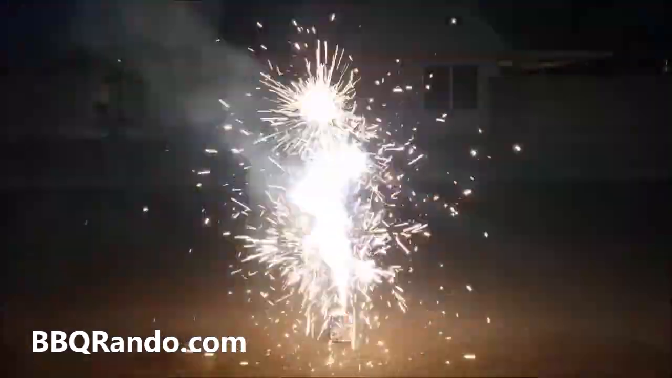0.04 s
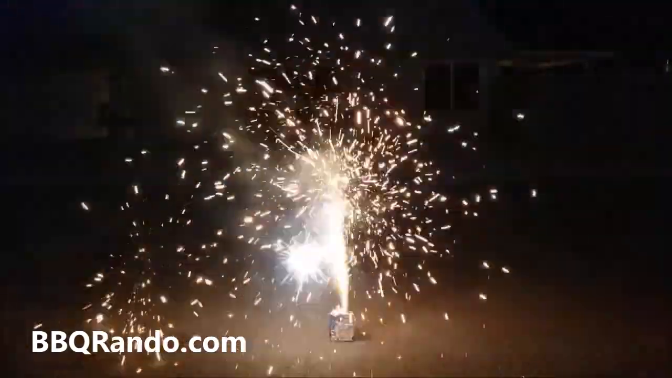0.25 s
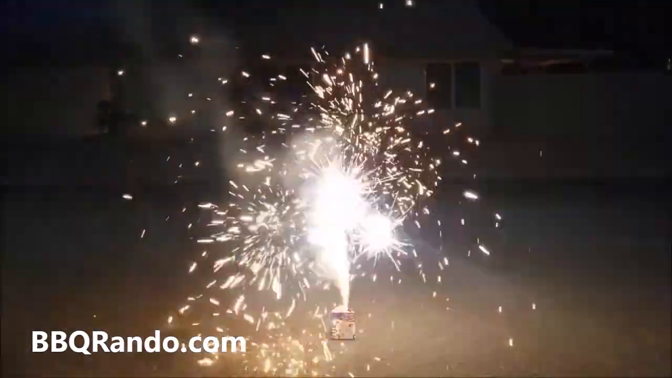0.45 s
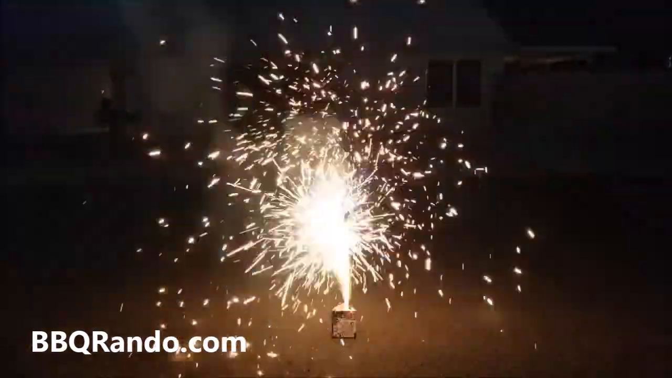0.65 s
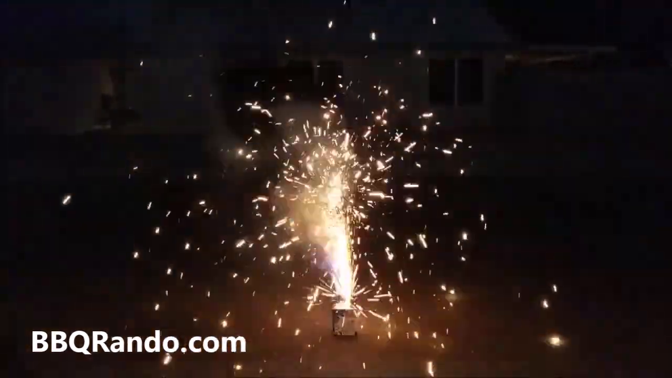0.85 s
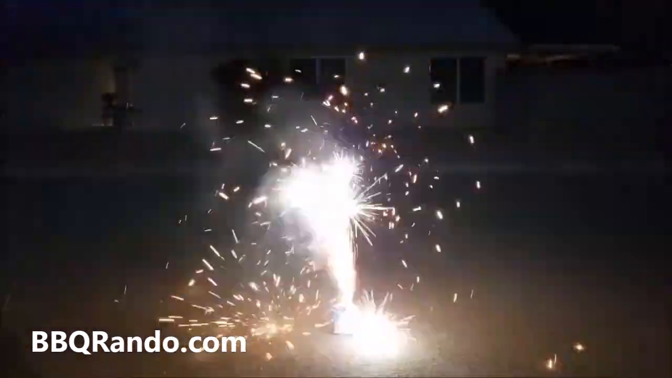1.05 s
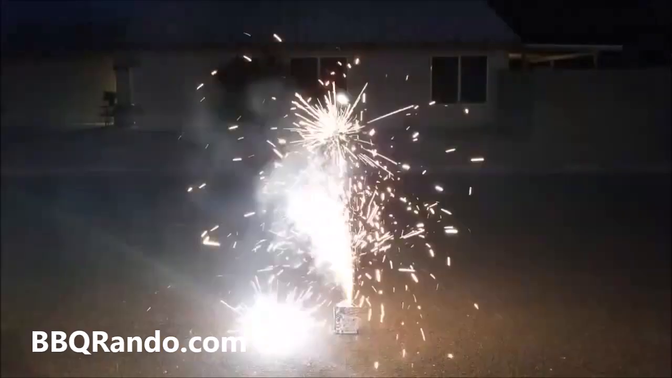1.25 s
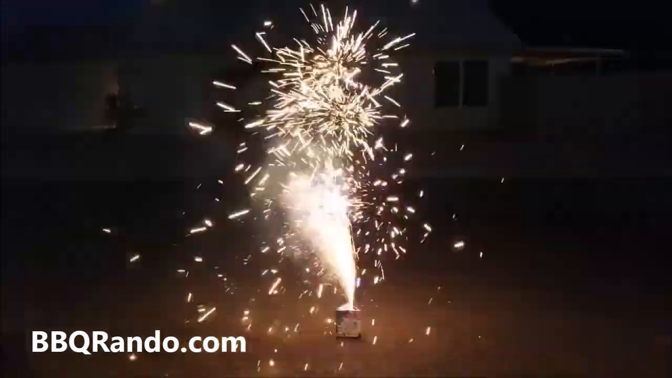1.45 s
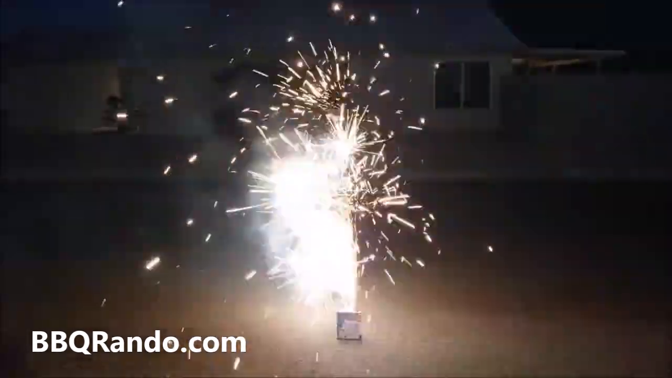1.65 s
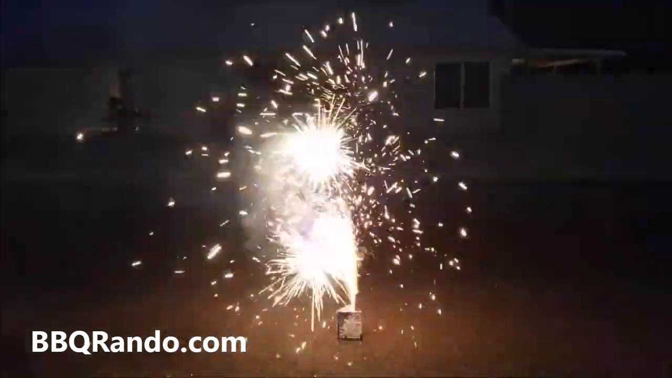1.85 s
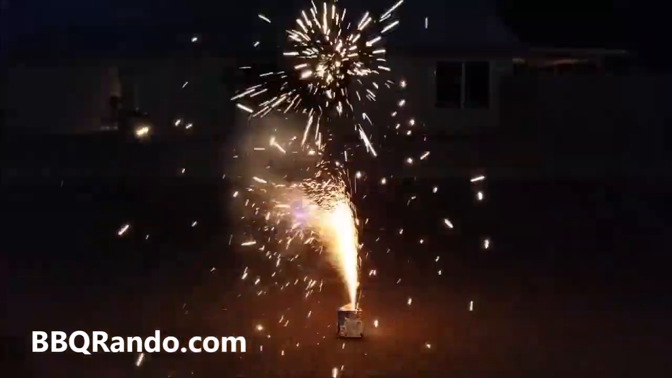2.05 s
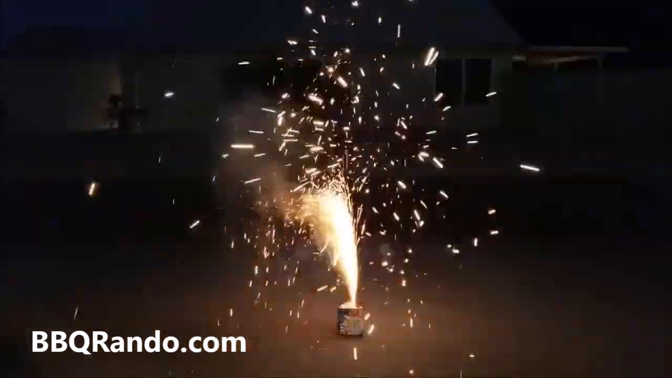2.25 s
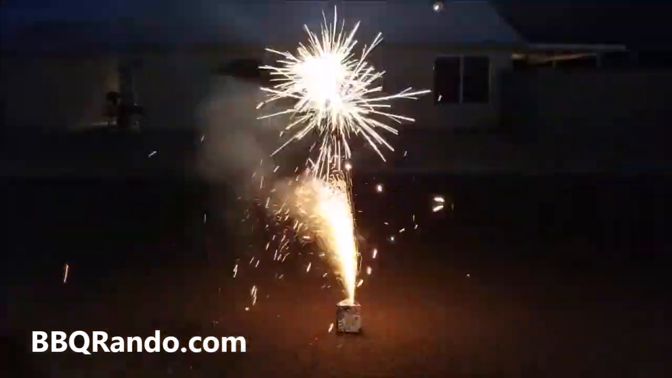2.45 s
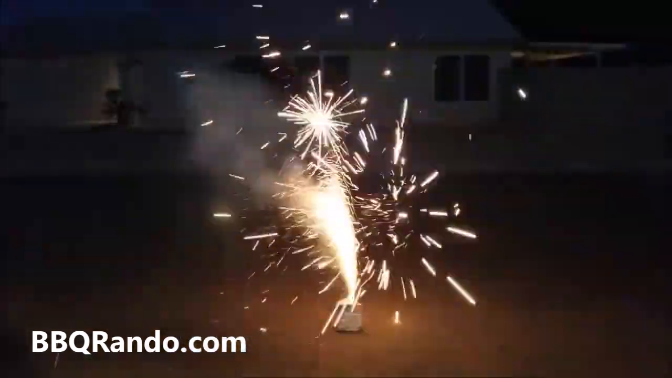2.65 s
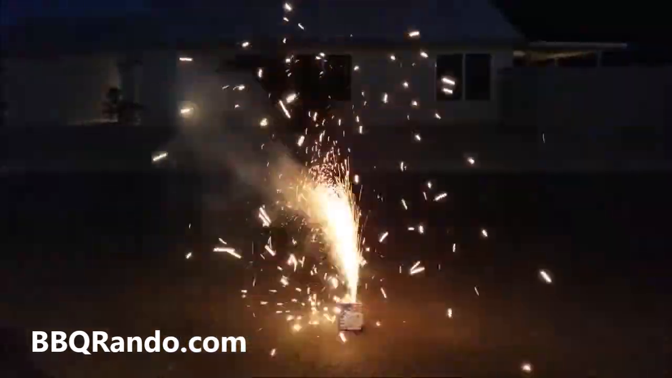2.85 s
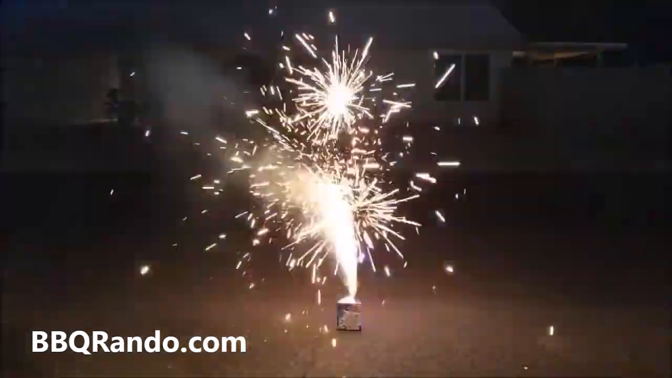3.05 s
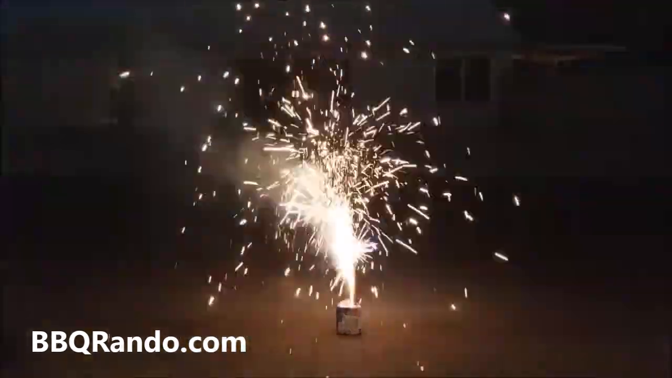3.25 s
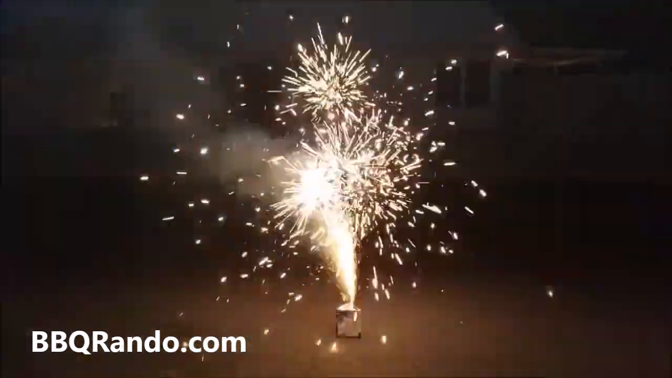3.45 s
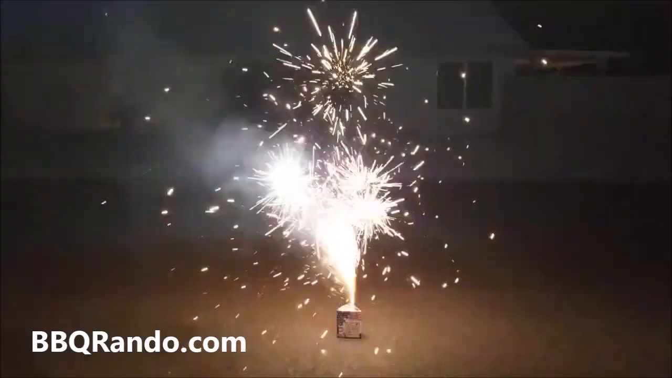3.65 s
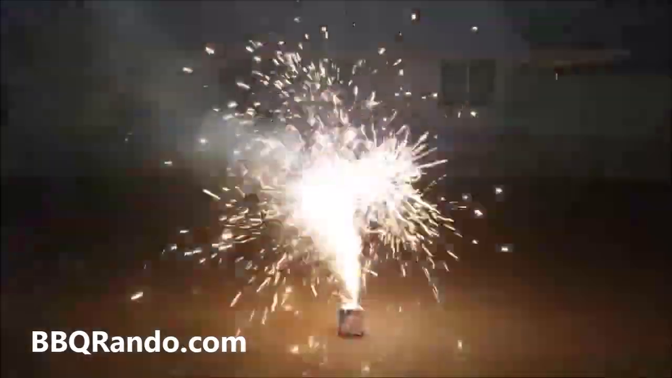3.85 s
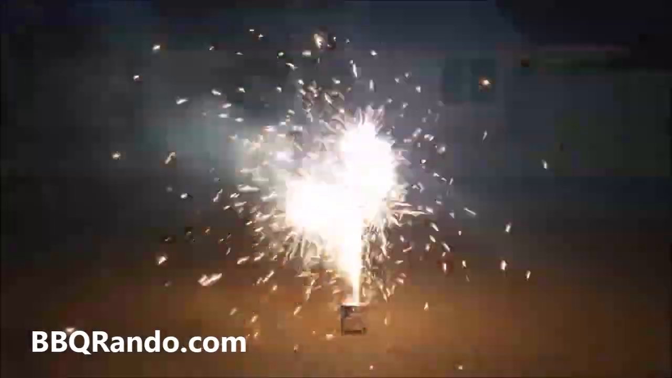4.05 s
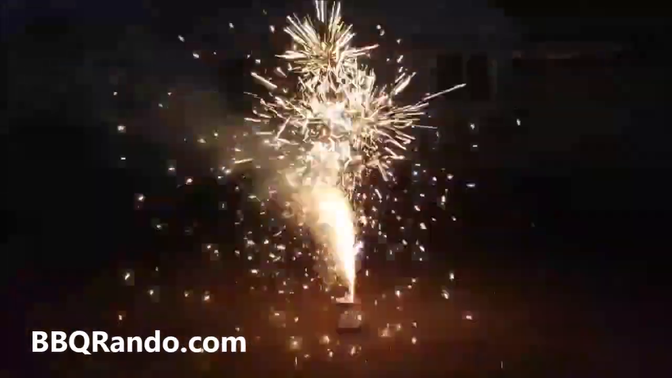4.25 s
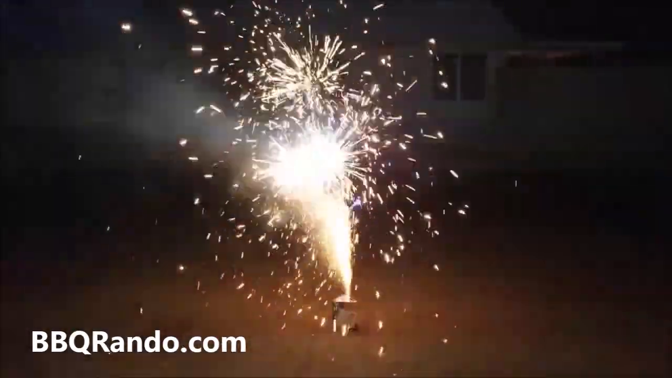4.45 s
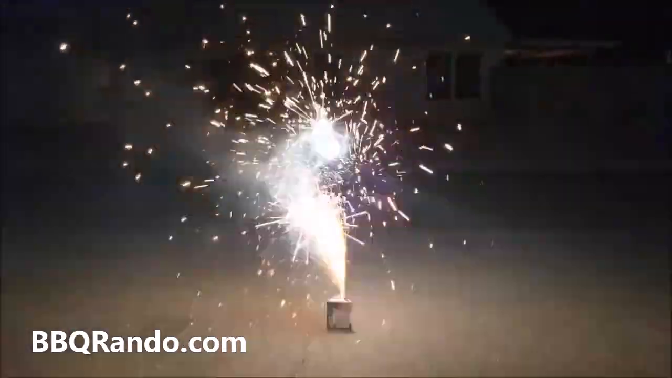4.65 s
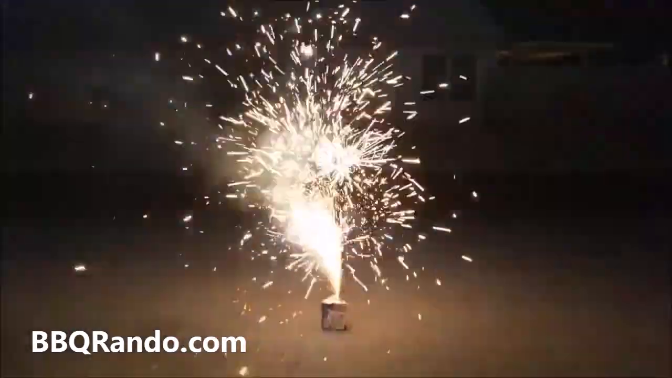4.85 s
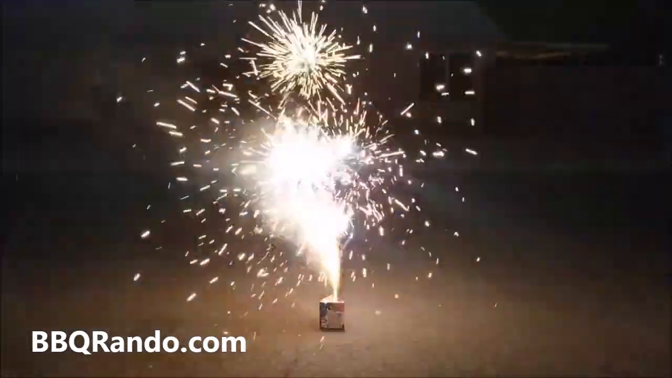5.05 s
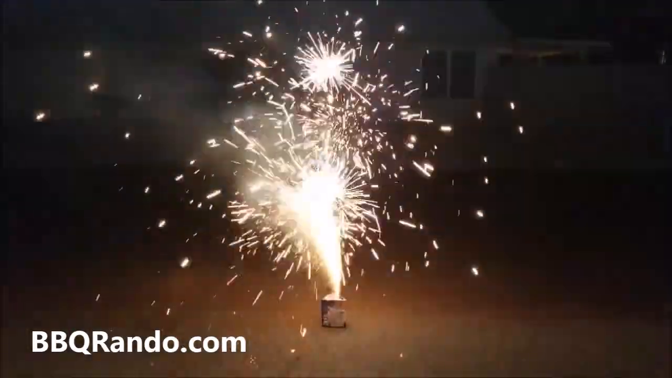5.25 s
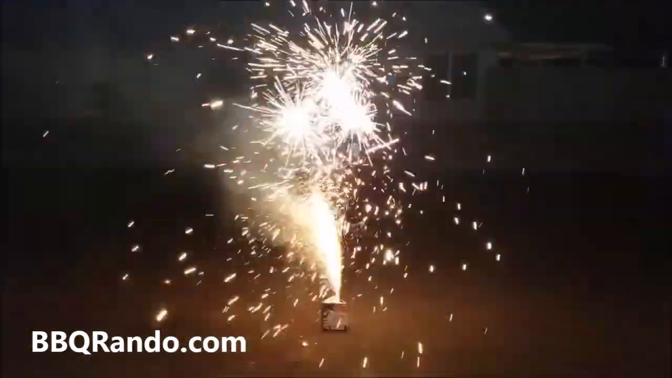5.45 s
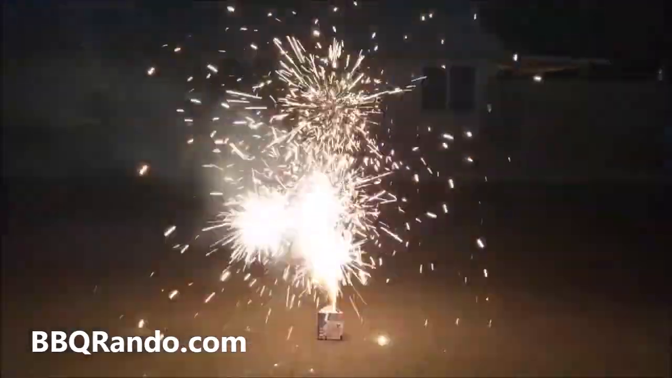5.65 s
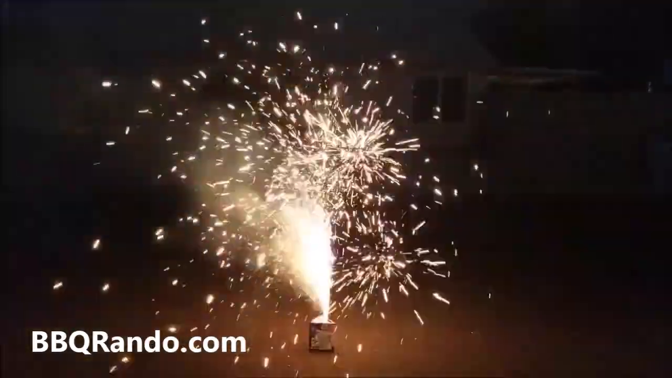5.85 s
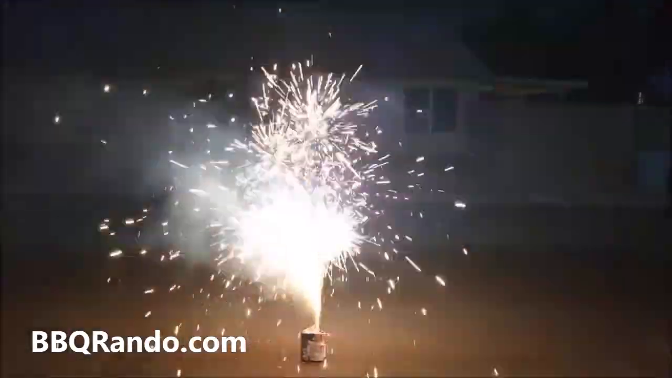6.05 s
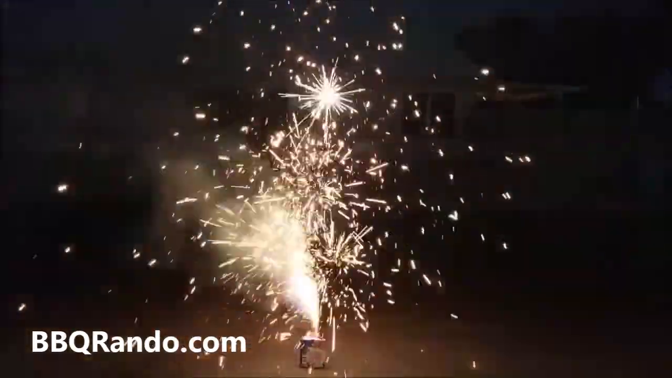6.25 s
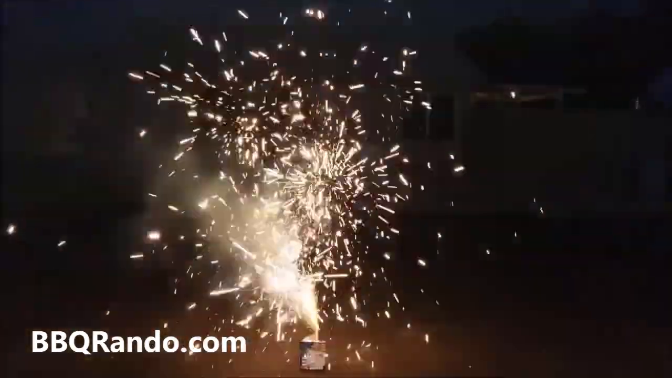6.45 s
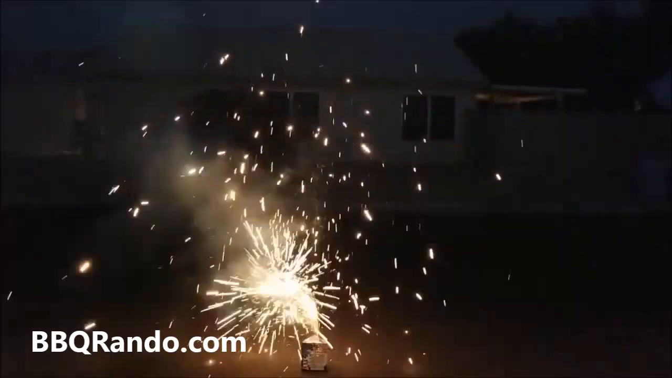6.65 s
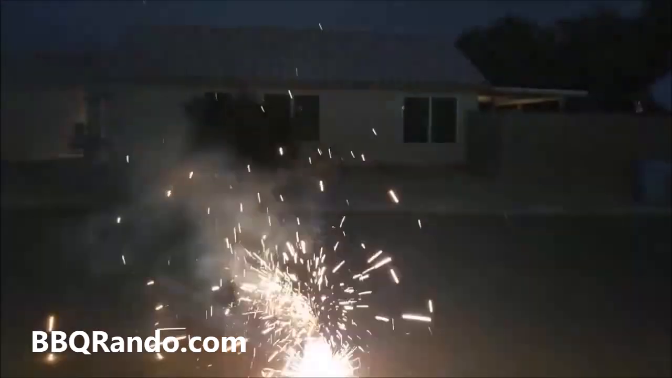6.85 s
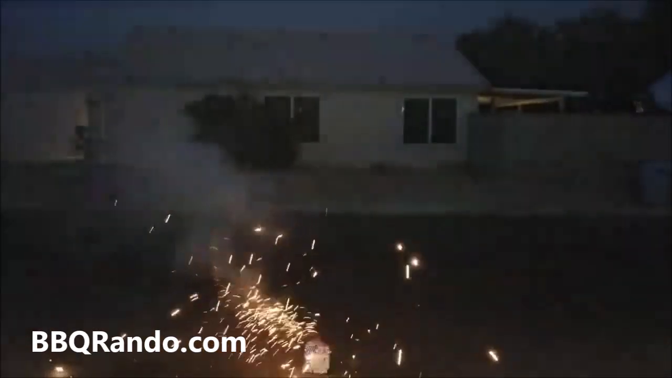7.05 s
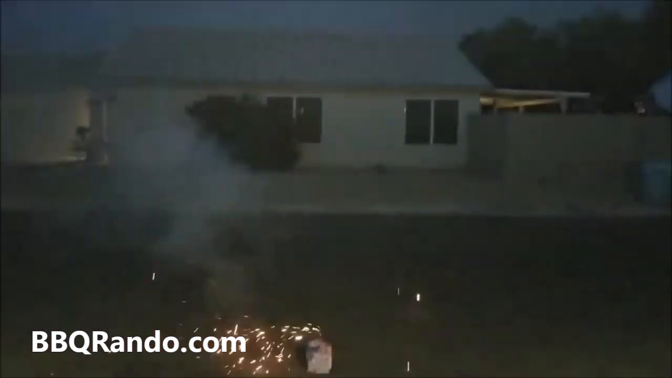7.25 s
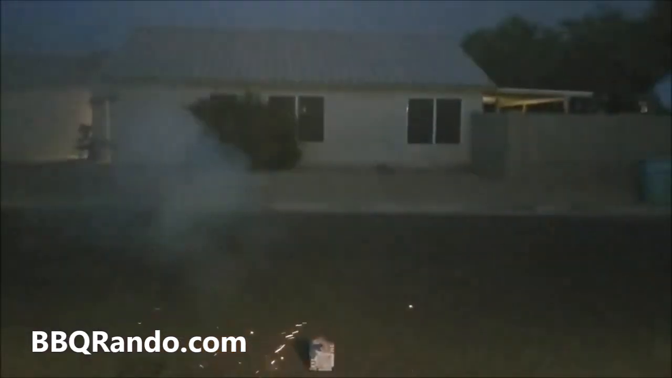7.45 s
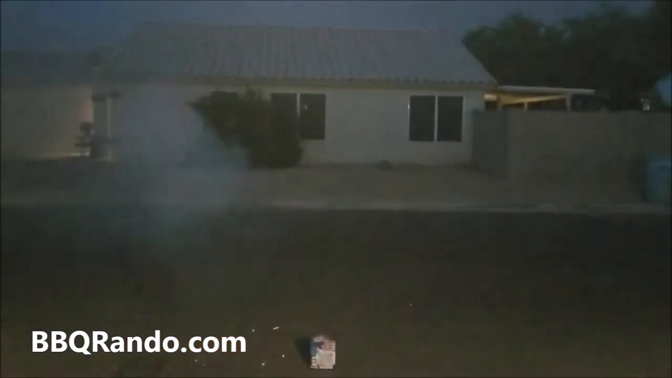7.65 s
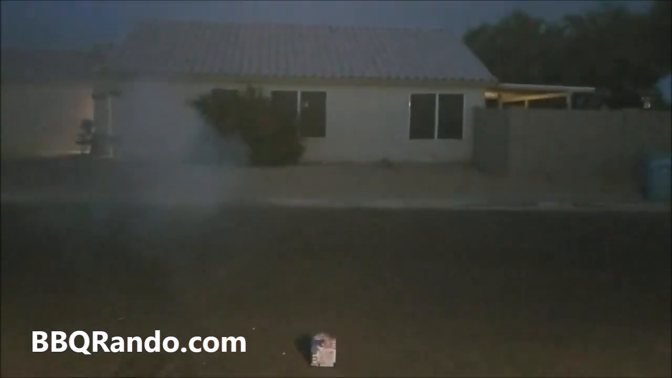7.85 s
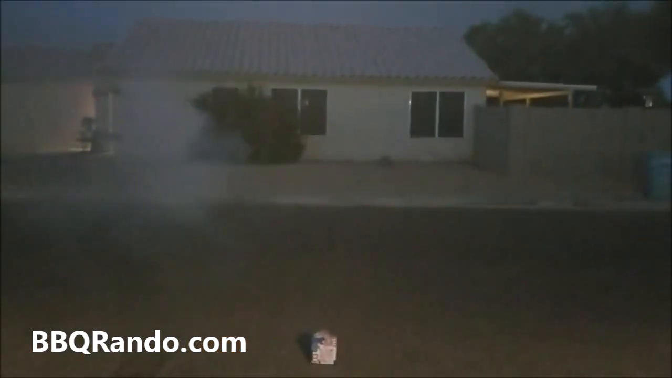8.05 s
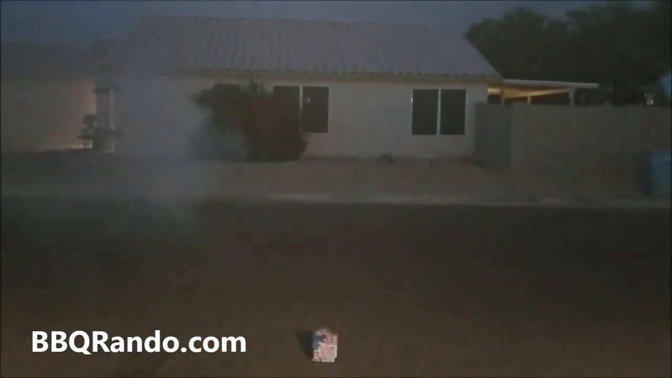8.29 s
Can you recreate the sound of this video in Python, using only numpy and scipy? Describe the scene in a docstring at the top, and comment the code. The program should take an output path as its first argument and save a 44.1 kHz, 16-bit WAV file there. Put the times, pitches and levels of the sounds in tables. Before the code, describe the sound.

A ground firework fountain crackles furiously with sharp, dense pops over a faint hiss outdoors, then stops near seven seconds, leaving a low distant hum.

```python
"""A ground fountain firework burns on a quiet street at dusk, a few metres away, over the hum of a distant town.
From the start its jet hisses (coloured noise) and its stars crackle: clusters of sharp clicks amid noise.
Ground and houses answer with delayed copies and noise tails; damped low swings thump the left microphone port.
From about two seconds the hand-held phone turns, which mixes in a second colour at each port.
Near seven seconds the last pops sound and the jet dies away; the town hum, low filtered noise, is left."""
import sys
import numpy as np
from scipy import signal
from scipy.fft import rfft, irfft, next_fast_len
from scipy.io import wavfile

SR = 44100
rng = np.random.default_rng(int(sys.argv[2]) if len(sys.argv) > 2 else 0)


def to_wav(s):
    """Save 16-bit WAV."""
    ch = np.atleast_2d(s).T  # columns
    pcm = np.round(np.clip(ch, -1, 1) * 32767)  # PCM
    wavfile.write(sys.argv[1], SR, pcm.astype(np.int16))


N = 366896
TIME = np.arange(N) / SR
CRACK_MS = 2.8   # length of a star that goes off all at once
LEAD_MS = 0.7    # noise leads each star's first click by this long, for a softer onset


def from_db(db):
    """Amplitude factor of a level in dB."""
    return 10 ** (np.asarray(db) / 20)


def rms_one(x):
    """Scale to rms 1."""
    return x / np.sqrt(np.mean(x ** 2) + 1e-20)


def in_time(rows):
    """Value of a (seconds, value) curve at every sample."""
    return np.interp(TIME, *np.transpose(rows))


def coloured(x, spectrum, size=2048):
    """Causal minimum-phase filter through (Hz, dB) points, by folding the cepstrum."""
    hz, level_db = np.transpose(spectrum)
    grid_hz = np.maximum(np.arange(size // 2 + 1) * SR / size, 1)
    gain_db = np.interp(np.log(grid_hz), np.log(hz), level_db)
    cepstrum = irfft(np.log(from_db(gain_db)))
    cepstrum[1:size // 2] *= 2
    cepstrum[size // 2 + 1:] = 0
    response = irfft(np.exp(rfft(cepstrum)))
    return signal.oaconvolve(np.atleast_2d(x), response[None], axes=1)[:, :N]


def air_noise(spectrum, alike_hz):
    """Stereo noise of rms 1: alike at both ports in the bass, unrelated in the treble."""
    shared = rng.standard_normal(N)
    own = rng.standard_normal((2, N))
    low = signal.butter(2, alike_hz, "low", fs=SR, output="sos")
    high = signal.butter(2, alike_hz, "high", fs=SR, output="sos")
    return rms_one(coloured(signal.sosfilt(low, shared) + signal.sosfilt(high, own), spectrum))


def jet(gain_db):
    """Turbulent hiss of the jet: coloured noise under a level curve."""
    # Each row: time in seconds, relative level in dB.
    jet_level = [(0, -41), (.7, -46.5), (1.0, -48.5), (1.9, -46), (2.4, -48), (2.85, -42), (3.7, -45),
                 (4.3, -43), (5.1, -44.5), (6.4, -48.5), (6.6, -75.5), (6.9, -61), (7.3, -87)]
    # Spectrum of the roar. Each row: frequency in Hz, relative density in dB.
    jet_spectrum = [(100, -7), (500, -7), (1100, -0.5), (1550, 4.5), (2300, 1.5), (4000, -1), (7000, -10.5),
                    (16000, -16)]
    return from_db(in_time(jet_level) + gain_db) * air_noise(jet_spectrum, alike_hz=1544)


def town():
    """Hum of the distant town: mostly low noise, 3 dB stronger at the left."""
    # Each row: time in seconds, relative level in dB.
    town_level = [(0, -60.5), (6.9, -59), (7.4, -58.5), (8.3, -55)]
    # Spectrum. Each row: frequency in Hz, relative density in dB.
    town_spectrum = [(25, -26), (50, 0), (120, -8), (260, -7.5), (400, -16), (1100, -14), (2450, -17.5),
                     (3000, -29), (6300, -35.5), (9500, -55), (12500, -37.5), (16000, -43.5)]
    balance = from_db([[1.5], [-1.5]])
    return from_db(in_time(town_level)) * air_noise(town_spectrum, alike_hz=482) * balance


def star(length_ms, pops_per_ms, spread_db, fizz_db, ground_db, ground_ms, clump_db, clump_full_ms, size=1500):
    """One star: grains pop at random, as a rule a big one first, amid noise; rms 1 over its length."""
    span = max(int(length_ms * SR / 1000), 2)
    total = next_fast_len(span + size)
    count = 1 + int(abs(length_ms * pops_per_ms))
    index = np.arange(count)[:, None]
    later = index > 0
    at_s = (index + rng.random((count, 1)) * later) / count * span / SR

    # the opening pop stands out more in a long run
    first_db = 1 + np.log2(length_ms / CRACK_MS)
    later_db = spread_db * np.clip(rng.standard_normal((count, 1)), -2, 1.3)
    sizes = from_db(np.where(later, later_db, first_db))

    # each grain: a click with its own broad resonance, on average slightly later at the right port
    hz = np.arange(total // 2 + 1) * SR / total
    resonance_hz = np.exp(rng.uniform(np.log(900), np.log(14000), (count, 1)))
    ratio = 1j * hz / resonance_hz
    grains = sizes * (1 + 1.1 * ratio / (1 + ratio + ratio ** 2))
    lags_s = np.array([np.zeros((count, 1)), rng.normal(2e-5, 3e-5, (count, 1))])
    phase = (2 * np.pi * hz * (at_s + lags_s + LEAD_MS / 1000)).astype(np.float32)
    pops = irfft(np.sum(grains * (np.cos(phase) - 1j * np.sin(phase)), axis=1), total)

    noise_on = np.arange(total) < span + LEAD_MS * SR / 1000
    fizz = rng.standard_normal((2, total)) * noise_on
    burst = rms_one(pops) + from_db(fizz_db) * rms_one(fizz)

    # clumps, strongest in long bursts
    depth_db = clump_db * min(length_ms / clump_full_ms, 1)
    period_s = rng.uniform(0.00914, 0.019)
    burst = burst * from_db(depth_db * np.cos(2 * np.pi * TIME[:total] / period_s))

    # the star's height sets the delay of the ground echo
    delay_ms = ground_ms * rng.uniform(0.6, 1.4)
    echo = np.roll(burst, int(delay_ms * SR / 1000), axis=1)
    return rms_one(burst + from_db(ground_db) * echo) * np.sqrt(span / total)


def echo_power(t, t60_s, swell_s):
    """Power of a diffuse echo that swells, then dies away; sums to 1."""
    power = (from_db(-60 * t / t60_s) * (1 - np.exp(-(t / swell_s) ** 2))) ** 2
    return power / power.sum()


def scatter(x, level_db, t60_s, swell_s):
    """Dense reflections: noise that follows each pop and dies away, different at each port."""
    t = TIME[:x.shape[1]]
    fade = echo_power(t, t60_s, swell_s)
    power = signal.fftconvolve(x ** 2, fade[None], axes=1)[:, :len(t)]
    return from_db(level_db) * np.sqrt(np.abs(power)) * rng.standard_normal(x.shape)


def small_stars():
    """Weak cracks at uneven intervals, at a changing rate: rows (seconds, relative dB)."""
    # Each row: time in seconds, stars per second (below 0 counts as none).
    star_rate = [(0, 12), (1.7, 6), (1.9, 1), (2.9, -0.5), (3.1, 15), (5.3, 12.5), (5.9, 0)]
    mean_db, spread_db = -32.5, 1.5
    thrown = np.cumsum(np.maximum(in_time(star_rate), 0)) / SR
    chance = rng.random((int(thrown[-1]), 2))
    start_s = np.interp(np.arange(len(chance)) + chance[:, 0], thrown, TIME)
    return zip(start_s, mean_db + spread_db * (2 * chance[:, 1] - 1))


def crackle(crack_gain_db, sputter_gain_db):
    """All the stars, each with its own brightness and its own scatter off the rough ground."""
    # Stars that break up in a run of pops. Each row: start in seconds, length in ms, relative level in dB.
    sputter_rows = [(.001, 19.7, -26.5), (.047, 30.7, -24), (.079, 62, -29.5), (.186, 65, -28.5),
                    (.323, 25, -28), (0.367, 36.4, -26.5), (.416, 19.4, -26.5), (.479, 40, -28.5),
                    (.552, 41, -28.5), (.676, 40.5, -30.5), (.921, 33.4, -28.5), (1.079, 19, -27.5),
                    (1.127, 25.4, -27.5), (1.423, 27.2, -27.5), (1.627, 25, -29), (1.695, 29.6, -25.5),
                    (1.78, 30, -29.5), (1.833, 18, -27), (2.722, 11.3, -23), (2.904, 11, -23),
                    (3.001, 42.5, -30), (3.069, 49, -27.5), (3.251, 22, -29), (3.306, 12, -25.5),
                    (3.36, 53, -29.5), (3.475, 8.5, -23.5), (3.563, 21.7, -29.5), (3.641, 40, -24),
                    (3.695, 57.4, -25.5), (3.816, 36.4, -24.5), (3.871, 70, -33), (4.041, 31.4, -30),
                    (4.106, 35.6, -26.5), (4.163, 72, -33.5), (4.325, 29, -29.5), (4.384, 9.7, -28.5),
                    (4.504, 10, -27.5), (4.681, 48, -28.5), (4.79, 33.4, -29.5), (4.857, 96, -30.5),
                    (5.01, 66, -31), (5.211, 48.6, -28.5), (5.346, 109, -31), (5.476, 9.4, -25),
                    (5.513, 15.7, -28), (5.592, 7.2, -22.5), (5.675, 62, -32), (5.782, 12.5, -24.5),
                    (5.821, 18.2, -28.5), (5.921, 40.3, -27), (6.016, 18, -28), (6.077, 39, -32),
                    (6.166, 50, -30.5), (6.309, 21.2, -28.5), (6.373, 6.2, -25), (6.402, 55, -30)]
    # Stars that go off in one crack. Each row: start in seconds, relative level in dB.
    crack_rows = [(.034, -20.5), (.148, -22), (.289, -24), (.538, -26.5), (.617, -27), (.63, -24.5),
                  (.639, -24), (.66, -23.5), (.749, -23), (.767, -25), (.778, -26), (.81, -29.5),
                  (.873, -28), (.884, -26.5), (1.005, -28), (1.013, -20.5), (1.16, -25), (1.17, -21.5),
                  (1.188, -21), (1.241, -26), (1.259, -24), (1.286, -18.5), (1.39, -18.5), (1.403, -24),
                  (1.485, -29.5), (1.507, -29), (1.52, -27), (1.587, -26), (1.609, -18.5), (1.669, -21),
                  (1.682, -34), (1.751, -24), (1.799, -24.5), (1.969, -28.5), (1.981, -31), (1.996, -28.5),
                  (2.03, -21.5), (2.155, -19.5), (2.168, -21.5), (2.2, -22), (2.299, -26), (2.365, -33.5),
                  (2.448, -25.5), (2.454, -21.5), (2.521, -27), (2.59, -19.5), (2.637, -32), (2.677, -26.5),
                  (2.962, -21), (2.993, -17), (3.028, -21.5), (3.131, -24), (3.145, -24), (3.178, -22.5),
                  (3.215, -21.5), (3.226, -21.5), (3.295, -24.5), (3.325, -25), (3.346, -19.5),
                  (3.431, -21), (3.458, -19), (3.507, -24), (3.534, -25.5), (3.599, -20), (3.624, -28),
                  (3.789, -23.5), (3.802, -18.5), (3.903, -24), (3.948, -19.5), (3.97, -23), (3.982, -22.5),
                  (4.013, -25), (4.078, -21), (4.24, -28), (4.26, -22.5), (4.401, -32), (4.418, -26),
                  (4.441, -26), (4.46, -23), (4.481, -22), (4.577, -24), (4.598, -25.5), (4.619, -25),
                  (4.631, -24.5), (4.654, -30.5), (4.765, -24.5), (4.8, -25), (4.843, -25), (4.973, -27),
                  (4.995, -19.5), (5.107, -21), (5.116, -31), (5.135, -24), (5.166, -23), (5.19, -29),
                  (5.279, -24.5), (5.308, -28), (5.321, -25.5), (5.459, -25.5), (5.541, -27), (5.616, -23),
                  (5.644, -24.5), (5.661, -21.5), (5.702, -20.5), (5.741, -23), (5.911, -25),
                  (6.001, -25.5), (6.053, -22), (6.122, -25.5), (6.156, -23.5), (6.183, -25.5),
                  (6.235, -26.5), (6.263, -25.5), (6.276, -25.5), (6.471, -25), (6.551, -32), (6.589, -45),
                  (6.625, -30.5), (6.659, -24.5), (6.776, -26.5), (6.865, -24.5), (6.899, -43),
                  (7.056, -48.5)]
    stars = [(s, length_ms, db + sputter_gain_db) for s, length_ms, db in sputter_rows]
    stars += [(s, CRACK_MS, db + crack_gain_db) for s, db in [*crack_rows, *small_stars()]]
    out = np.zeros((2, N + SR))
    for start_s, length_ms, level_db in stars:
        burst = star(length_ms, pops_per_ms=0.75, spread_db=5.0, fizz_db=-7.0,
                     ground_db=-9.5, ground_ms=3.1, clump_db=5, clump_full_ms=46)
        burst = burst + scatter(burst, level_db=-4.5, t60_s=0.039, swell_s=0.00024)
        dull = signal.lfilter([0.4], [1, -0.6], burst)
        burst = dull + (burst - dull) * from_db(rng.normal(0, 1.55))
        start = max(round((start_s - LEAD_MS / 1000) * SR), 0)
        out[:, start:start + burst.shape[1]] += from_db(level_db) * burst
    return out[:, :N]


def street(x, level_db, t60_s, swell_s):
    """Diffuse echo off the houses: noise that swells after each pop and dies away."""
    # Echo spectrum. Each row: frequency in Hz, relative level in dB.
    echo_spectrum = [(100, 1.5), (600, 4.5), (2000, 6), (6000, 3.5), (16000, -2.5)]
    fade = echo_power(TIME[:SR // 2], t60_s, swell_s)
    power = signal.oaconvolve(np.mean(x ** 2, axis=0), fade)[:N]
    return from_db(level_db) * np.sqrt(np.abs(power)) * air_noise(echo_spectrum, alike_hz=900)


def thumps(gain_db, right_db, edge_hz):
    """Pressure steps on the left port: damped low swings, each at a slightly different pitch."""
    # Each row: start in seconds, relative level in dB.
    thump_rows = [(0.149, -39), (1.096, -35), (1.171, -39), (1.707, -37), (2.029, -40), (2.96, -28.5),
                  (3.178, -23.5), (3.327, -19), (3.392, -17), (3.534, -24.5), (3.624, -20), (3.696, -15),
                  (4.384, -31.5), (4.481, -19.5), (4.633, -34), (4.824, -37), (5.309, -21.5),
                  (6.867, -32.5)]
    top_hz, t60_s = 62, 0.069
    out, t = np.zeros(N + SR), TIME[:SR // 5]
    edge = signal.butter(1, [30, edge_hz], "band", fs=SR, output="sos")
    for start_s, level_db in thump_rows:
        hz = top_hz * rng.uniform(0.77, 1.0)
        swing = np.cos(2 * np.pi * hz * t) * from_db(-60 * t / t60_s)
        start = round(start_s * SR)
        out[start:start + len(t)] += from_db(level_db + gain_db) * signal.sosfilt(edge, swing)
    return out[:N] * from_db([[0], [right_db]])


def bangs(cycles):
    """Coarse grains: heavily damped pressure swings that fall 60 dB in a few cycles."""
    # Each row: start in seconds, relative peak level in dB, pitch in Hz.
    bang_rows = [(1.014, -18, 1090), (1.017, -23, 297), (1.286, -19, 1300), (6.776, -18.5, 1220)]
    out, t = np.zeros(N), TIME[:SR // 50]
    for start_s, peak_db, hz in bang_rows:
        start = round(start_s * SR)
        out[start:start + len(t)] += from_db(peak_db - 60 * t * hz / cycles) * np.cos(2 * np.pi * hz * t)
    return out


def phone_ports(x):
    """The phone's body colours each port; turning fades from the facing to the turned colours."""
    # Each row: frequency in Hz, then level in dB: left facing, right facing, left turned, right turned.
    port_colours = np.array([(43.8, -1.5, -6, -1, -13), (130, 2, 3, 3, -4.5), (357, -1.5, -5, -5, -3),
                             (480, -7.5, -6, -7, -13), (674, -1.5, -2, -3, -6),
                             (1070, -5.5, -2, -2.5, -10.5), (1790, -2, 2.5, 2.5, -6), (5200, -1, -1, 5, -6),
                             (6630, -0.5, -2, 8, 2), (7830, -2, -3.5, 4.5, -13),
                             (9350, -5, -5.5, -9.5, -8.5), (12180, 3.5, 7, 4, -3.5),
                             (16070, 3, 2, 0.5, -3.5)])
    # Each row: time in seconds, turn from 0 (facing) to 1 (turned).
    turn_curve = [(2.2, 0.052), (3.0, 0.48), (3.8, 0.74), (4.3, 0.51), (5.1, 0.98), (6.6, 1)]
    turn = np.clip(in_time(turn_curve), 0, 1)
    left_facing = coloured(x[0], port_colours[:, [0, 1]])[0]
    right_facing = coloured(x[1], port_colours[:, [0, 2]])[0]
    left_turned = coloured(x[0], port_colours[:, [0, 3]])[0]
    right_turned = coloured(x[1], port_colours[:, [0, 4]])[0]
    return (1 - turn) * np.array([left_facing, right_facing]) + turn * np.array([left_turned, right_turned])


def scene():
    """Jet, pops and house echo pass the phone's body; thumps and town are added after it."""
    hiss = jet(gain_db=-1.5)
    pops = crackle(crack_gain_db=-0.18, sputter_gain_db=-1.32) + bangs(cycles=3.7)
    houses = street(pops, level_db=-16.5, t60_s=0.34, swell_s=0.008)
    at_ports = phone_ports(pops + houses + hiss)
    return at_ports + thumps(gain_db=4.5, right_db=-34, edge_hz=1300) + town()


def record(dry):
    """Round the sharpest peaks; cut the deepest bass and the top."""
    rounded = 0.61 * np.tanh(dry / 0.57)
    bass_cut = signal.butter(2, 22, "high", fs=SR, output="sos")
    top_cut = signal.ellip(10, 0.2, 70, 15900, fs=SR, output="sos")   # ripple dB, stopband dB, edge Hz
    return signal.sosfilt(top_cut, signal.sosfilt(bass_cut, rounded))


dry = scene()
out = record(dry)
to_wav(out)
```